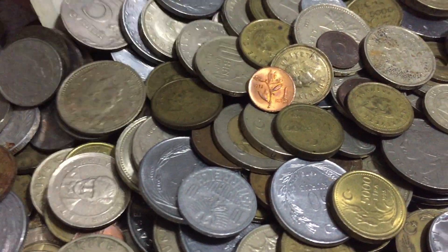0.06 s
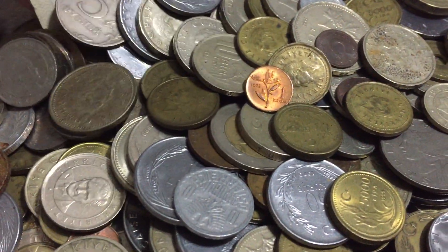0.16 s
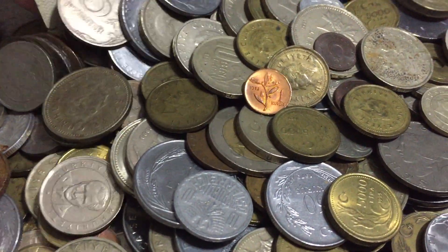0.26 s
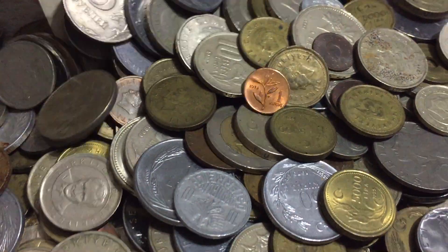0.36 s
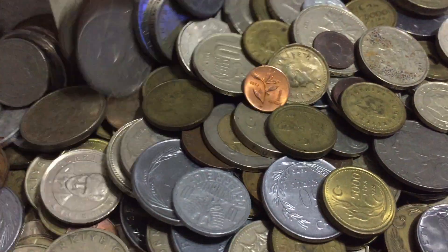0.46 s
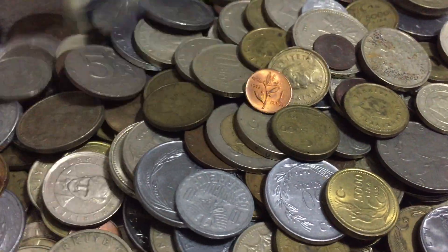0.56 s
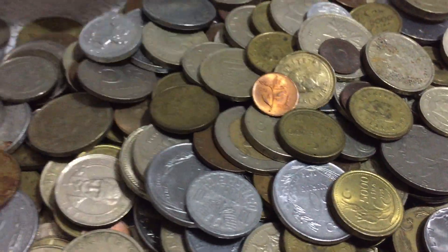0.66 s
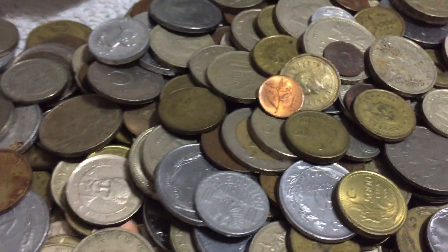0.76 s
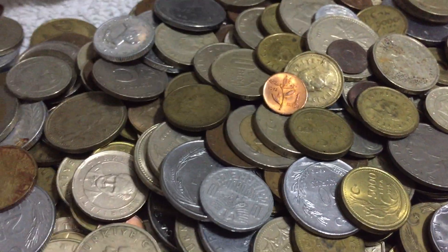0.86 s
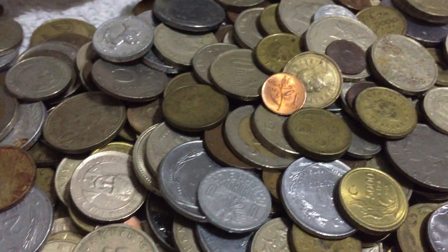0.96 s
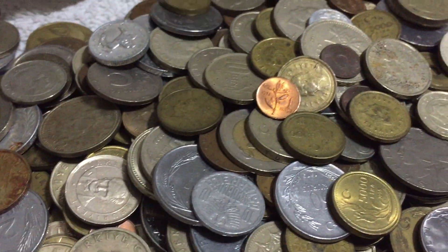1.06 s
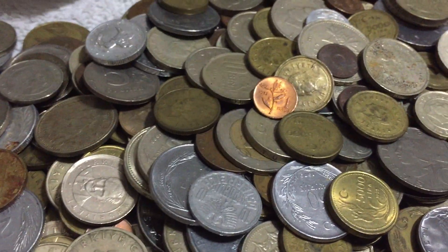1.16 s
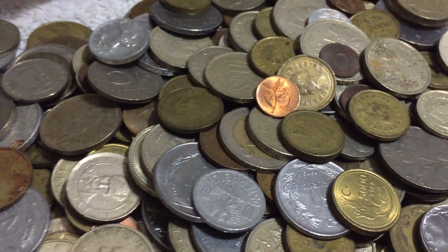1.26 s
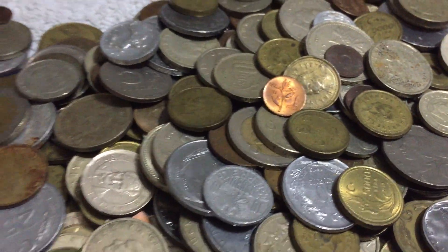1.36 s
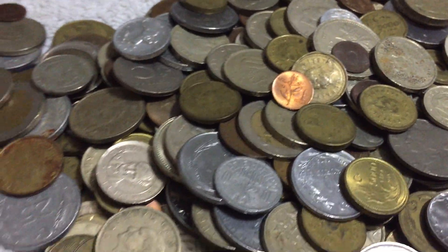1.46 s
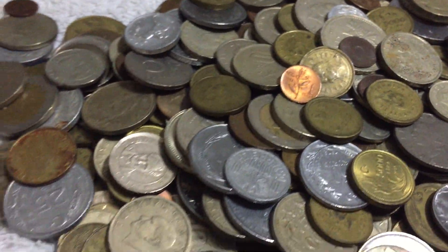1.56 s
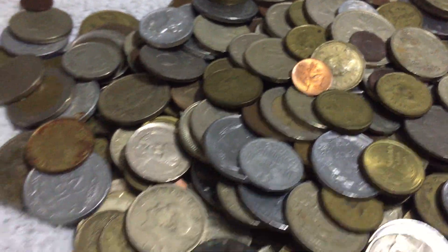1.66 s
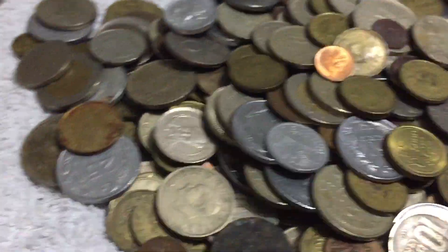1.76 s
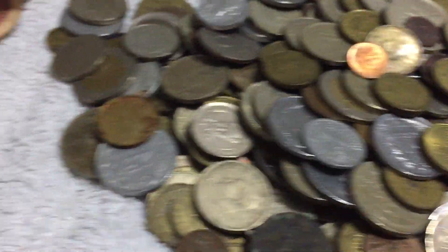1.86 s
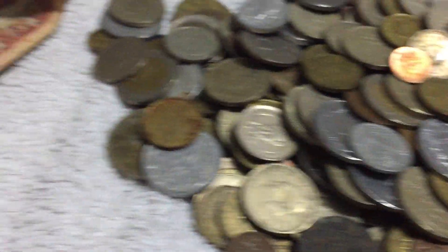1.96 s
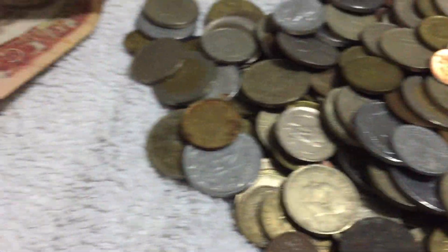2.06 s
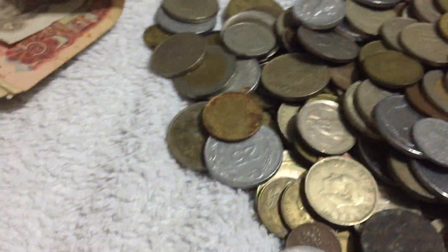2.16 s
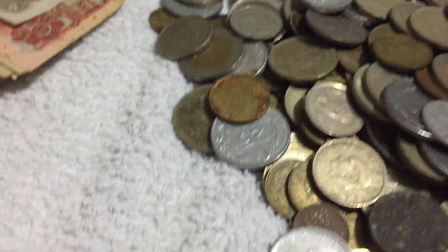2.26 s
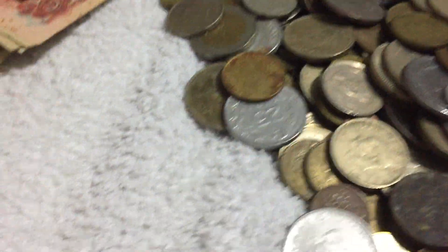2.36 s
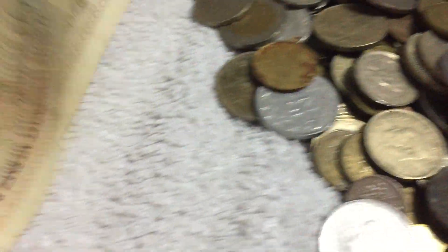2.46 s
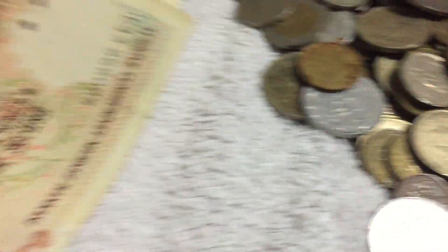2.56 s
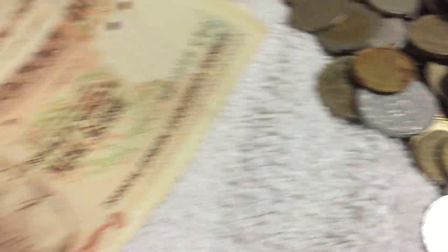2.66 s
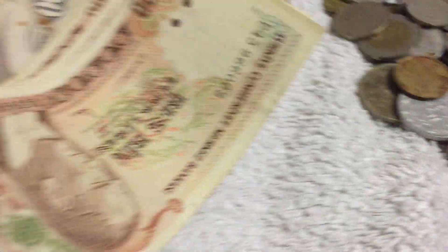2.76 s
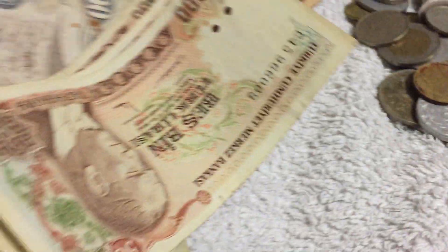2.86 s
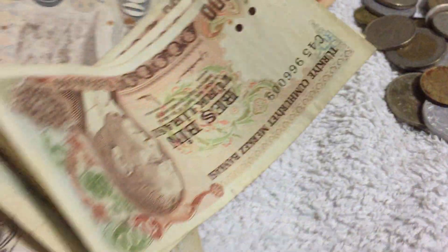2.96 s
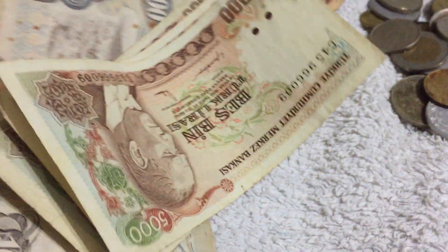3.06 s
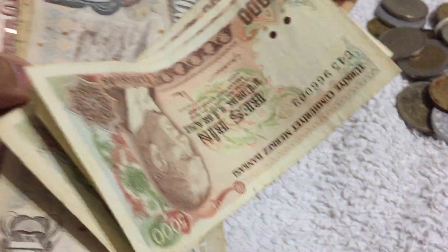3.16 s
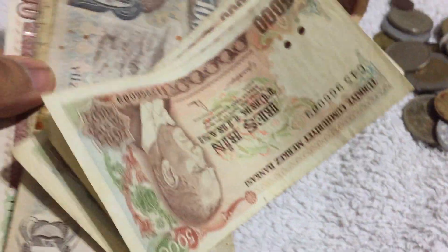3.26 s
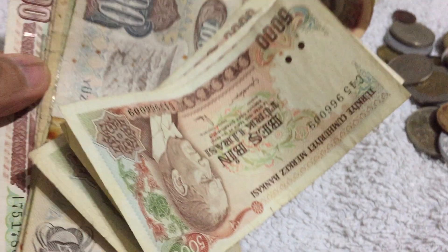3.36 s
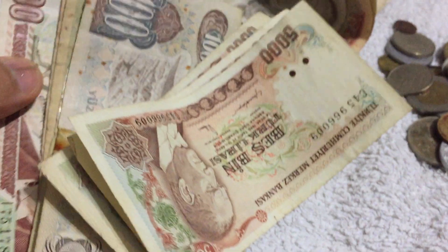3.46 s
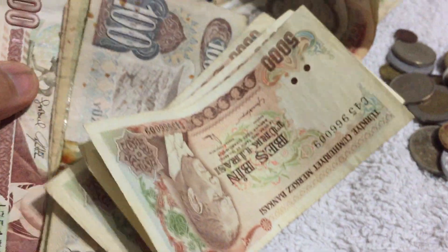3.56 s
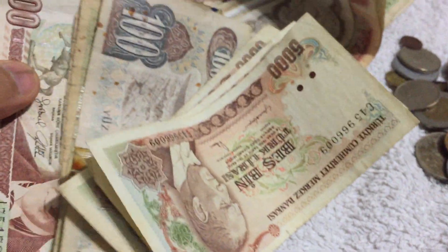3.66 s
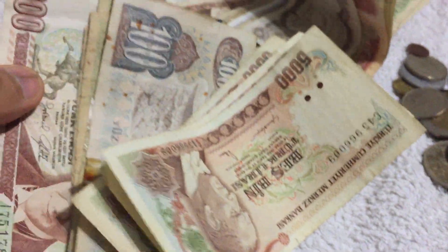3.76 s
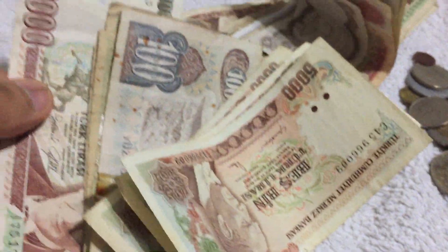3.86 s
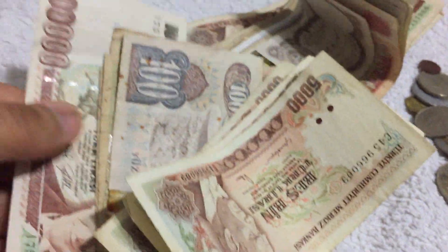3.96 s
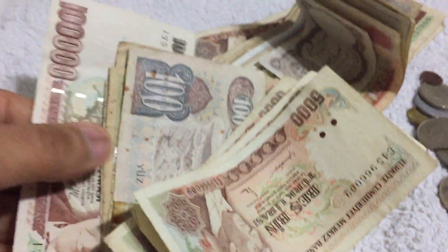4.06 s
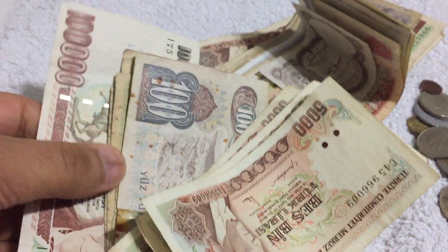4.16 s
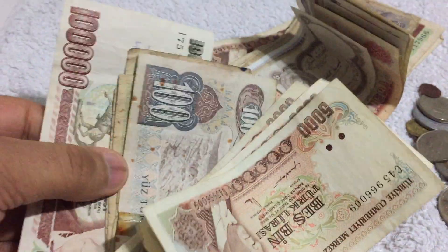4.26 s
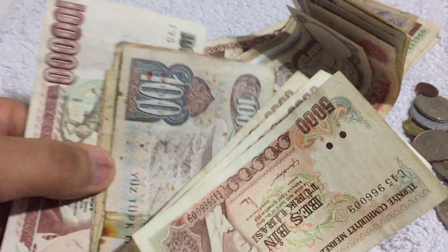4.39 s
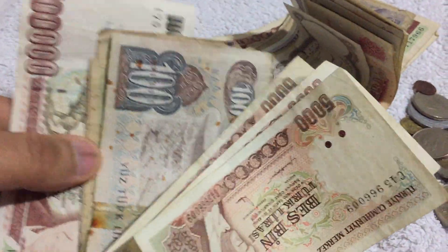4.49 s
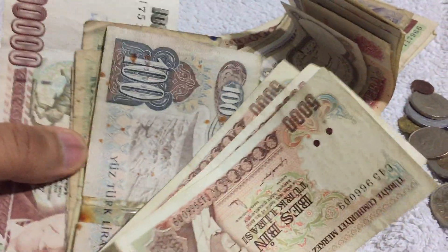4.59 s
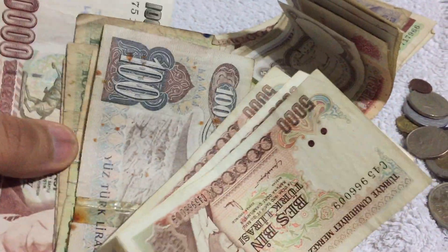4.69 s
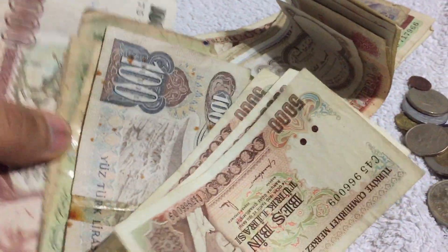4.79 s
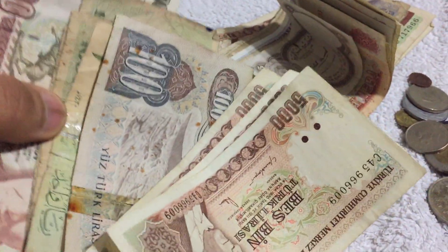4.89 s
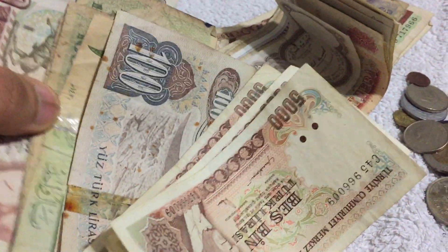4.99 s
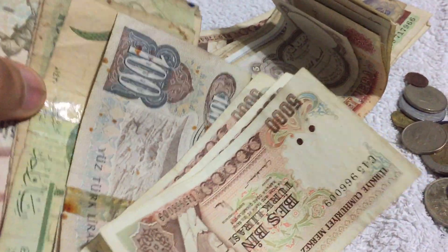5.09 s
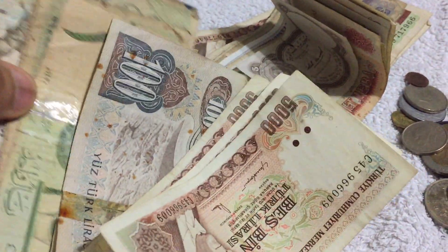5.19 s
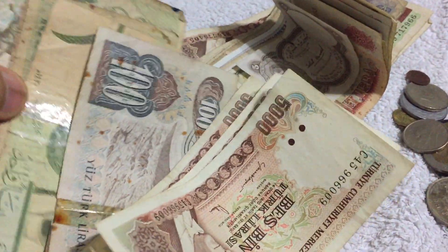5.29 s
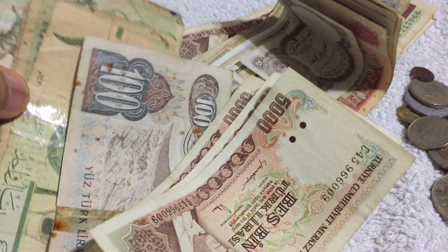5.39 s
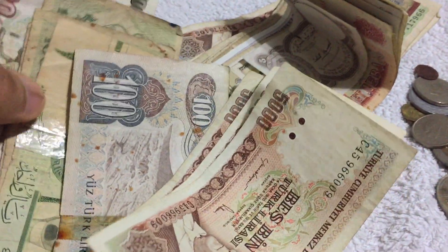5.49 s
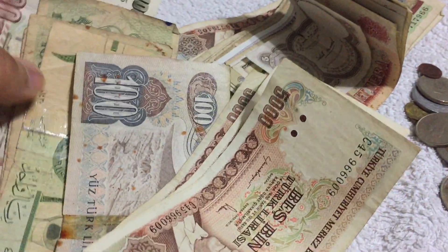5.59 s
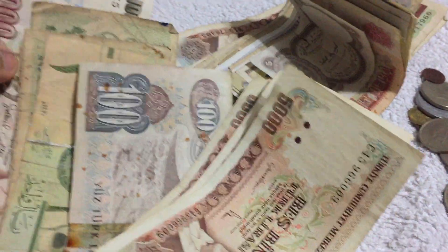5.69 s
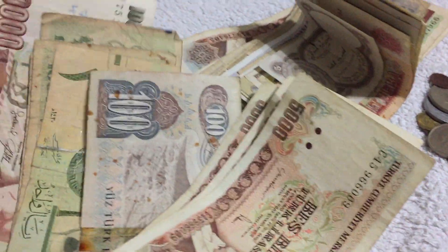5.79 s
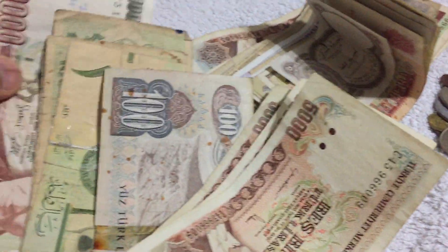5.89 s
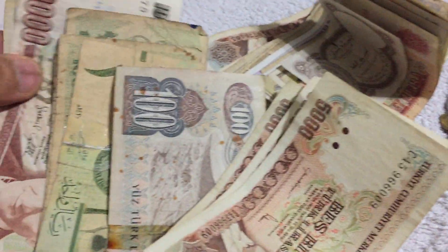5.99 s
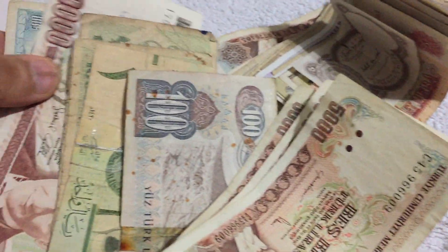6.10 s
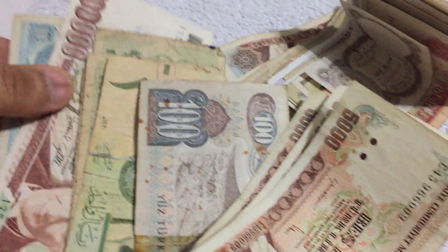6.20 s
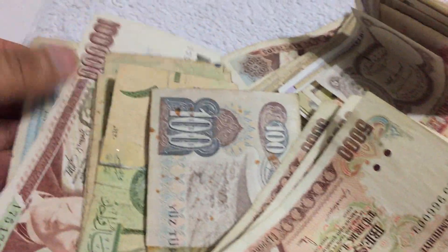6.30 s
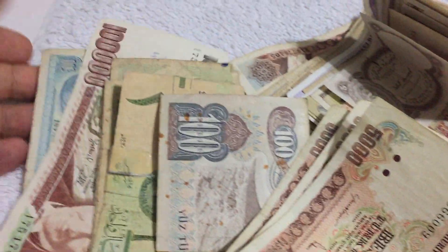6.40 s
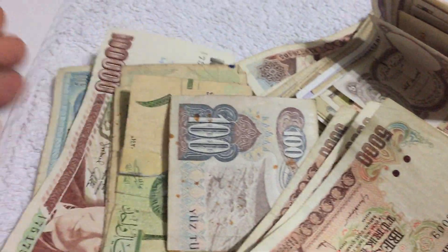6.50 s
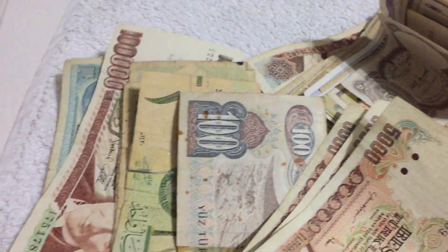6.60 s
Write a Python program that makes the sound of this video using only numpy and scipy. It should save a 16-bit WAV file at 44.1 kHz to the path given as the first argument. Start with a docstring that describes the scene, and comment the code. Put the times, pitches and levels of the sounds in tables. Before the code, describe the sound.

A heap of metal coins clinks loudly as it is stirred, then paper banknotes rustle faintly over a low hum.

```python
"""In a small room with a low hum, close to the microphone, a hand stirs a heap of coins on a table covered
by a towel. The coins scrape and clink against each other, then slide in a rush at about half a second.
Just after one second a soft thump shakes the table, and the last coins drop and ring.
From about two seconds on, old banknotes are pushed about and leafed through: their fibres catch and slip,
their creases snap, and now and then the hand bumps the towel."""
import sys
import numpy as np
from scipy import signal
from scipy.fft import rfft, irfft
from scipy.io import wavfile

SR = 44100
rng = np.random.default_rng(int(sys.argv[2]) if len(sys.argv) > 2 else 0)


def wav_record(signal):
    """Record a signal, one row per channel, as 16-bit PCM in the file named by sys.argv[1]."""
    frames = np.transpose(np.atleast_2d(signal))
    bounded = np.clip(frames, -1, 1)
    # unit amplitude maps onto the largest positive 16-bit level
    quanta = np.round(bounded * 32767).astype(np.int16)
    wavfile.write(sys.argv[1], SR, quanta)


N = 292868
TIME = np.arange(N) / SR


def from_db(db):
    """Turn decibels into a number to multiply a sound by."""
    return 10 ** (np.asarray(db) / 20)


def unit_power(x):
    """Scale a sound so that its average power is 1."""
    return x / np.sqrt(np.mean(x ** 2) + 1e-20)


def at_hz(points, hz):
    """Read a table between its rows, giving every octave the same room."""
    pitches, values = np.transpose(points)
    return np.interp(np.log(np.maximum(hz, 1)), np.log(pitches), values)


def colour(x, tone):
    """Give a sound a tone: the table says how strong each pitch is next to the others."""
    size = 4096
    strengths = from_db(at_hz(tone, np.arange(size // 2 + 1) * SR / size))
    cepstrum = irfft(np.log(strengths))
    # folding it in half makes a filter that never sounds ahead of a hit
    cepstrum[1:size // 2] *= 2
    cepstrum[size // 2 + 1:] = 0
    response = irfft(np.exp(rfft(cepstrum)))
    return signal.oaconvolve(x, response / np.linalg.norm(response))[:N]


def ring(clicks, hz, ring_s):
    """Each click starts a pure tone. Here and below, ring_s is the time it takes to fade by 60 dB."""
    keep = from_db(-60 / (ring_s * SR))
    turn = 2 * np.pi * hz / SR
    return signal.lfilter([0, np.sin(turn)], [1, -2 * keep * np.cos(turn), keep * keep], clicks + 1e-18)


def add(track, start_s, sound):
    """Mix a sound into a track at the given time."""
    i = int(np.clip(round(start_s * SR), 0, N - 1))
    track[i:i + len(sound)] += sound[:N - i]


def strikes(rows):
    """Make one click for each row of start_s, level_db."""
    clicks = np.zeros(N)
    for start_s, level_db in rows:
        add(clicks, start_s, from_db([level_db]))
    return clicks


def grains(per_s, spread_db):
    """Tiny contacts at random times; a larger spread makes their strengths more uneven."""
    sizes = from_db(spread_db * np.minimum(rng.exponential(1, N), 4)) * rng.choice([-1, 1], N)
    touching = rng.random(N) < per_s / SR
    return unit_power(sizes * touching / np.sqrt(per_s))


def burst(fade_s):
    """A brief crunch of tiny slips that fades by 60 dB in fade_s."""
    t = TIME[:SR // 8]
    slips = rng.choice([-1, 1], len(t)) * rng.uniform(.2, 1, len(t)) * from_db(-60 * t / fade_s)
    return slips / np.linalg.norm(slips)


def friction(level, slow_per_s, extra_per_s, spread_db):
    """A slow movement slips in separate catches; a fast one adds more and runs them together."""
    return level * grains(slow_per_s + extra_per_s * level / level.max(), spread_db)


def movements(rows):
    """Four loudness curves: each hand movement swells for rise_s, then loses 20 dB in fade_s."""
    fade_shape = 1.1   # above 1: slowly at first, then faster
    power, t = np.zeros((4, N)), TIME[:SR * 3 // 4]
    for start_s, rise_s, fade_s, level_db, *offsets_db in rows:
        swell = np.sin(np.pi / 2 * np.minimum(t / rise_s, 1))
        fade = from_db(-20 * (np.maximum(t - rise_s, 0) / fade_s) ** fade_shape)
        for layer, offset_db in zip(power, [0, *offsets_db]):
            add(layer, start_s, (from_db(level_db + offset_db) * swell * fade) ** 2)
    return np.sqrt(power)


def room(x, echo_db):
    """The walls add a wash of echoes in which high pitches die sooner than low ones."""
    # how long the room rings: pitch_hz, ring_s
    ring_times = [(150, .5), (600, 0.21), (3000, 0.27), (8000, .22), (16000, 0.16)]
    t, tail = TIME[:SR // 2], 0
    edges_hz = np.geomspace(60, 17000, 9)
    for low, high in zip(edges_hz, edges_hz[1:]):
        band_filter = signal.butter(2, [low, high], "band", fs=SR, output="sos")
        band = signal.sosfilt(band_filter, rng.standard_normal(len(t)))
        tail = tail + band * from_db(-60 * t / at_hz(ring_times, np.sqrt(low * high)))
    tail = tail * (t > .004)   # the first echo takes 4 ms
    return x + from_db(echo_db) * signal.oaconvolve(x, tail / np.linalg.norm(tail))[:N]


def background():
    """Still air and the wavering hum of a distant appliance, there from start to end."""
    # the tones of the hum: pitch_hz, width_hz, level_db
    hum_tones = [(283, 18, -79.5), (343.4, 3.6, -76), (395, 2.6, -82.5)]
    # the tone of the air: pitch_hz, level_db
    air_tone = [(20, -25.5), (45, -4.5), (80, -2), (180, -4.5), (260, -4), (380, -7.5), (520, -13),
                (800, -14.5), (1500, -16), (3000, -17.5), (5000, -21.5), (8000, -24), (10500, -25.5),
                (15500, -26)]
    hum = 0
    for pitch_hz, width_hz, level_db in hum_tones:
        ring_s = np.log(1000) / (np.pi * width_hz)
        hum = hum + from_db(level_db) * unit_power(ring(rng.standard_normal(N), pitch_hz, ring_s))
    return hum + from_db(-71.5) * colour(rng.standard_normal(N), air_tone)


def heap_motion():
    """Loudness curves for scrape, jingle, knock and rumble as the hand pushes and the heap slides."""
    # the hand pushes into the heap: start_s, rise_s, fade_s, scrape_db,
    # then, counted from scrape_db: jingle_db, knock_db, rumble_db
    pushes = [(0.0, 0.0013, 0.1, -40, 1, -4.5, -23), (.06, 0.053, .07, -50.5, -20, -0.5, -13),
              (.135, 0.033, 0.086, -46, -10, -4.5, -6), (.19, 0.079, 0.067, -43.5, -18, -14.5, -22),
              (.29, 0.058, 0.037, -41, -12, -7.5, -19.5), (.37, 0.12, 0.038, -41, -11, -10, -24),
              (.745, 0.029, 0.066, -51.5, 4, -10, -1), (.828, 0.046, 0.058, -49, 10, -11.5, 0.5),
              (.93, 0.079, 0.075, -55.5, 5.5, -9.5, -4.5)]
    # one side of the heap slides down: time_s, jingle_db, knock_db
    slide = [(.47, -48, -49.5), (.481, -22, -38), (.503, -31.5, -38), (.53, -22, -35), (.605, -23.5, -37),
             (.635, -24.5, -32), (.674, -13.5, -34.5), (.702, -26, -47), (.74, -25, -50),
             (.765, -53.5, -66.5)]
    times_s, *columns = np.transpose(slide)
    jingle, knock = [from_db(np.interp(TIME, times_s, db, left=-np.inf, right=-np.inf)) for db in columns]
    scrape = np.sqrt(jingle * knock)   # midway between the two
    weight = (scrape / scrape.max()) ** 1.9   # swells more steeply than the scrape
    lag_s = 0.028   # the heavy table follows a little late
    keep = np.exp(-1 / (lag_s * SR))
    rumble = signal.lfilter([1 - keep], [1, -keep], weight + 1e-18)
    sliding = [from_db(-2) * scrape, from_db(0.5) * jingle, knock, from_db(-31.5) * rumble]
    return np.hypot(movements(pushes), sliding)


def coin_contacts(contacts, ring_s, ring_db, count):
    """Each contact ticks and rings one of many coins, which its neighbours quickly hush."""
    pitches_hz = np.linspace(5500, 15600, count) + rng.uniform(-100, 110, count)
    rings_s = ring_s * from_db(rng.normal(0, 3.9, count))
    which_coin = rng.integers(0, count, N)
    ringing = np.zeros(N)
    for k in range(count):
        energy = rings_s[k] * SR / np.log(1e12)   # used to make long and short rings equally strong
        ringing += ring(contacts * (which_coin == k), pitches_hz[k], rings_s[k]) / np.sqrt(energy)
    return (contacts + from_db(ring_db) * ringing) / np.hypot(1, from_db(ring_db))


def sliding_coins(scrape, jingle, knock):
    """Coins pour over each other: rims jingle, faces scrape and knocks travel down through the heap."""
    # the tone of rims touching: pitch_hz, level_db
    rim_tone = [(2500, -31), (5500, -8), (7500, -5.5), (8500, 1), (10300, -3), (12000, -2.5), (14000, 4.5),
                (16000, -8.5)]
    # the tone of faces scraping: pitch_hz, level_db
    face_tone = [(900, -33), (2250, -8), (3200, -3), (4100, -3.5), (5200, -7), (6300, -0.5), (8000, -15),
                 (12000, -28)]
    # the tone of knocks inside the heap: pitch_hz, level_db
    heap_tone = [(150, -20.5), (400, -7), (620, 5), (900, -3.5), (1250, -1.5), (1750, -3.5), (2150, -14.5),
                 (5000, -29)]
    rim_hits = jingle * grains(per_s=4400, spread_db=5)
    rims = colour(coin_contacts(rim_hits, ring_s=0.028, ring_db=-0.5, count=72), rim_tone)
    faces = colour(friction(scrape, slow_per_s=900, extra_per_s=5100, spread_db=3.5), face_tone)
    depth = np.clip(knock / knock.max(), 1e-9, 1)
    deep = knock * np.sqrt(depth) * grains(per_s=1300, spread_db=0)
    light = knock * np.sqrt(1 - depth) * grains(per_s=830, spread_db=0.5)
    # light contacts stay in the top layer of the heap and lack its low pitches
    light = signal.sosfilt(signal.butter(2, 1200, "high", fs=SR, output="sos"), light)
    return from_db(-3) * rims + from_db(-0.75) * faces + from_db(1.5) * colour(deep + light, heap_tone)


def free_coins():
    """A coin held at just one point rings on; it is not quite round, so a twin tone makes it waver."""
    # coins that come free: start_s, pitch_hz, level_db, ring_s
    coins = [(.003, 11364, -35, 0.13), (0.215, 11300, -23, 0.033), (.326, 13100, -34, 0.15),
             (.555, 12700, -30, .065), (.57, 14000, -16, .05), (0.634, 11500, -21, .12),
             (.645, 14600, -18.5, .083), (.682, 11160, -13, 0.051), (.860, 13280, -28, 0.11),
             (.868, 12070, -28.5, 0.11), (0.879, 10380, -30.5, .11), (1.086, 11724, -14, 0.12),
             (1.192, 11120, -25, 0.17), (1.260, 14500, -28, .08), (1.268, 11140, -35.5, 0.19),
             (1.347, 10330, -43, .26), (1.346, 11220, -33, 0.3)]
    twin_gap_hz, twin_db = 14, -13
    ringing = np.zeros(N)
    for start_s, pitch_hz, level_db, ring_s in coins:
        hit = strikes([(start_s, level_db)])
        ringing += ring(hit, pitch_hz, ring_s)
        ringing += from_db(twin_db) * ring(hit, pitch_hz + twin_gap_hz, ring_s)
    return from_db(-1.5) * ringing


def knocks():
    """A stack gives way and lands flat: the whole heap answers with a dull clack."""
    # the heap settles: start_s, level_db
    landings = [(0.011, -45), (0.051, -39), (0.356, -26.5), (0.383, -36), (0.493, -15), (0.525, -19.5),
                (0.634, -23), (0.641, -25)]
    # the tones of the whole heap: pitch_hz, level_db, ring_s
    heap_tones = [(624, -10, 0.0082), (870, 0, 0.0046), (1160, 4, 0.0018), (1720, -6.5, 0.0055),
                  (3300, -13.5, 0.0036)]
    hits, clacks = strikes(landings), np.zeros(N)
    for k, (pitch_hz, level_db, ring_s) in enumerate(heap_tones):
        direction = (-1) ** k   # every second tone swings the other way
        clacks += direction * from_db(level_db) * ring(hits, pitch_hz, ring_s)
    return from_db(8.5) * clacks


def clinks(scrape):
    """Coin hits coin: a hard first touch, then weaker bounces. Stray ticks come wherever coins scrape."""
    # single hits and how long their bounces last: start_s, level_db, settle_s
    hits = [(0.0378, -19.5, 0.049), (0.048, -20, 0.023), (0.07, -19, 0.018), (0.1045, -24.5, 0.0068),
            (0.1812, -26, 0.018), (.1956, -27.5, 0.063), (0.215, -10.5, 0.013), (0.2247, -16, 0.019),
            (0.254, -16, 0.0067), (.2973, -39, .03), (.3106, -25, 0.014), (.3253, -20.5, 0.022),
            (0.357, -21.5, 0.013), (0.398, -30, 0.047), (.4094, -25, 0.039), (0.4447, -17, 0.031),
            (.477, -22, 0.028), (0.48, -8.5, 0.018), (.568, -9.5, 0.016), (0.6704, -4, 0.039),
            (0.6826, -4.5, 0.028), (.7377, -17, 0.047), (.7707, -32, .027), (.8156, -30.5, 0.016),
            (0.8687, -13.5, 0.04), (0.874, -22, 0.025), (1.0312, -27.5, 0.022), (1.0846, -13, 0.045),
            (1.1038, -12.5, 0.083), (1.133, -13.5, 0.026), (1.143, -21.5, 0.058), (1.1835, -21.5, .038),
            (1.1927, -8.5, 0.039), (1.209, -24.5, 0.1), (1.2354, -26.5, 0.12), (1.2598, -19, 0.071),
            (1.287, -22, 0.063), (1.3466, -23, 0.09)]
    # the tone of a clink: pitch_hz, level_db
    clink_tone = [(300, -41), (1500, -17), (2200, -17.5), (3200, -10.5), (6000, -5.5), (9000, 2.5),
                  (12000, 0), (16000, 0)]
    bounce_db, tick_db = -11, -6
    touches, bounce_level = np.zeros(N), np.zeros(N)
    for start_s, level_db, settle_s in hits:
        add(touches, start_s, from_db(level_db) * burst(fade_s=0.002))
        add(bounce_level, start_s, from_db(level_db + bounce_db - 60 * TIME[:SR // 4] / settle_s))
    ticks = from_db(tick_db) * scrape * grains(per_s=90, spread_db=5.5)
    bounces = bounce_level * grains(per_s=2700, spread_db=0.5)
    contacts = from_db(-0.5) * touches + bounces + ticks
    return colour(coin_contacts(contacts, ring_s=0.022, ring_db=-10, count=48), clink_tone)


def table(rumble):
    """The table rumbles under the moving heap, rings from soft blows, then rumbles as the hand bumps it."""
    # the tone of the rumble: pitch_hz, level_db
    rumble_tone = [(25, -23), (80, -1.5), (130, 0.5), (210, 5), (300, -2), (450, -20.5), (1200, -51)]
    # soft blows on the table: start_s, level_db
    blows = [(1.047, -0.5), (1.074, -5)]
    # the tones of the table top: pitch_hz, level_db, ring_s
    board_tones = [(138.3, -32, 0.18), (174.4, -51, 1), (196, -17.5, 0.039), (217, -45, 0.64),
                   (273, -35, 0.23), (350, -35.5, 0.11), (485, -44, 0.062), (520, -47.5, 0.075),
                   (809, -49, 0.11)]
    # the hand bumps the towel: start_s, level_db
    bumps = [(3.002, -65.5), (3.175, -66), (4.421, -75.5), (5.938, -74.5), (6.024, -77), (6.549, -67)]
    soft_hits = signal.sosfilt(signal.butter(3, 850, fs=SR, output="sos"), strikes(blows))
    thump = sum(from_db(db) * ring(soft_hits, hz, ring_s) for hz, db, ring_s in board_tones)
    # a board gives off little sound below its lowest tone
    thump = signal.sosfilt(signal.butter(4, 124, "high", fs=SR, output="sos"), thump)
    bump_fade = np.exp(-TIME[:SR // 2] / 0.085)   # down to about a third in 85 ms
    shaking = rumble.copy()
    for start_s, level_db in bumps:
        add(shaking, start_s, from_db(level_db) * bump_fade)
    return room(thump, echo_db=-12) + from_db(-1.5) * shaking * colour(rng.standard_normal(N), rumble_tone)


def shifting():
    """Four faint loudness curves, steady once the hand holds the notes and they shift under it."""
    # the quiet between strokes: rub_db, edge_db, rasp_db, brush_db
    levels_db = (-75.5, -82, -79.5, -83)
    reach_s, hold_s = 1.8, 2.03
    return np.outer(from_db(levels_db), np.interp(TIME, [reach_s, hold_s], [0, 1]))


def banknotes():
    """Fibres catch and slip as the sheets slide over each other and over the towel."""
    # a note is pushed or leafed over: start_s, rise_s, fade_s, rub_db,
    # then, counted from rub_db: edge_db, rasp_db, brush_db
    strokes = [(1.86, 0.023, 0.14, -66, -8, -20.5, -6), (1.93, 0.14, .13, -59.5, -12, -25.5, -7.5),
               (2.12, 0.085, 0.21, -69.5, -3.5, -16.5, 2.5), (2.332, 0.02, 0.16, -50, -26.5, -9, -11.5),
               (2.385, 0.017, 0.13, -52.5, -7.5, -5.5, -20), (2.51, 0.083, 0.083, -57.5, -3.5, -0.5, -11),
               (2.62, 0.16, .3, -70.5, -6.5, -4, -19.5), (2.89, 0.097, 0.29, -63, -3, -3, -6),
               (3.04, 0.16, 0.085, -70.5, -2, 0, -8.5), (3.27, 0.15, 0.19, -71.5, -10, -9, -15),
               (4.40, 0.032, 0.019, -63.5, -9, 8, -10), (4.55, 0.094, .26, -73, -1, -7, -15.5),
               (4.87, 0.056, 0.056, -69.5, 1.5, -6, -11), (5.11, 0.051, 0.064, -75.5, 8, -10, -11),
               (5.28, 0.029, 0.035, -72, 5.5, -8, -15), (5.40, 0.041, 0.043, -69, 1.5, -8, -19),
               (5.545, 0.05, 0.03, -58.5, -9.5, -1, -8.5), (5.64, 0.12, .2, -69, -5.5, -2, -7.5),
               (5.87, 0.064, 0.035, -63, -2, 0.5, -2), (5.94, 0.055, 0.067, -66.5, -4.5, -2, -11),
               (6.005, 0.02, 0.09, -53.5, -9, -5, -9.5), (6.025, 0.04, 0.087, -55.5, -5, 4, -10.5),
               (6.1, 0.12, 0.057, -61, -7.5, 5.5, -11), (6.35, 0.22, 0.14, -75.5, -4, 8, -3.5)]
    # the tone of note rubbing on note: pitch_hz, level_db
    rub_tone = [(900, -37), (1700, -15.5), (2100, -3), (2500, 1.5), (2850, -2), (3300, 2), (4400, 0.5),
                (5000, -3.5), (6200, -3.5), (9000, -40), (16000, -29)]
    # the hiss of the edges: pitch_hz, level_db
    edge_tone = [(3000, -18.5), (6500, 1), (8500, 0.5), (10500, -4.5), (12500, -2.5), (16000, -10.5)]
    # the rasp of the sheet: pitch_hz, level_db
    sheet_tone = [(600, -32.5), (950, -3.5), (1220, 2), (1450, 0.5), (1750, 3), (2100, -11), (3400, -35),
                  (4400, -13), (5200, -28)]
    # the brushing on the towel: pitch_hz, level_db
    towel_tone = [(100, -23.5), (250, -7.5), (480, -6.5), (700, -3), (900, -1.5), (1150, -10), (3000, -32)]
    rub, edge, rasp, brush = np.hypot(movements(strokes), shifting())
    rubbing = colour(friction(rub, slow_per_s=800, extra_per_s=10000, spread_db=0.5), rub_tone)
    edges = colour(friction(edge, slow_per_s=630, extra_per_s=7000, spread_db=2), edge_tone)
    sheet = colour(rasp * grains(per_s=3500, spread_db=2), sheet_tone)
    towel = colour(brush * grains(per_s=660, spread_db=3.5), towel_tone)
    paper = from_db(-0.17) * rubbing + from_db(3.2) * edges + from_db(-0.1) * sheet
    return paper + from_db(-0.5) * towel + creases(rub)


def creases(rub):
    """A crease snaps and leaves the sheet shivering; small ones give way wherever the notes rub."""
    # large creases snap: start_s, level_db
    snaps = [(2.104, -50), (2.181, -51), (2.348, -45.5), (2.577, -38), (2.984, -45.5), (3.159, -48.5),
             (3.171, -30.5), (4.409, -48.5), (4.427, -44.5), (4.933, -54), (5.148, -51.5), (5.586, -40.5),
             (5.924, -43), (6.013, -42), (6.541, -52.5)]
    # the tone of a snap: pitch_hz, level_db
    snap_tone = [(100, -7), (600, -29), (1100, 8), (1700, 0), (4200, 7), (5500, 0), (8500, 4), (11000, -4),
                 (16000, -38)]
    # the brief tones of a stiff note: pitch_hz, level_db, ring_s
    note_tones = [(992, -9, 0.014), (1714, -6, 0.024), (2674, -2, 0.011), (3440, -13, 0.0056),
                  (4240, 0, 0.0079)]
    crunch = from_db(-13.5) * rub * grains(per_s=32, spread_db=5)   # the small creases
    for start_s, level_db in snaps:
        snap = burst(fade_s=0.026)
        shiver = from_db(-3.5) * burst(fade_s=0.076)
        add(crunch, start_s, from_db(level_db + 8) * (snap + shiver))
    hits = strikes(snaps)
    ringing = sum(from_db(db) * ring(hits, hz, ring_s) for hz, db, ring_s in note_tones)
    return colour(crunch, snap_tone) + from_db(-6) * ringing


def scene():
    """Coins right under the microphone, then the notes a little farther off, in one channel."""
    scrape, jingle, knock, rumble = heap_motion()
    coins = sliding_coins(scrape, jingle, knock) + clinks(scrape) + free_coins() + knocks()
    mix = room(coins, echo_db=-19) + table(rumble) + room(banknotes(), echo_db=-15.5) + background()
    return mix[None]


def record(dry):
    """The very highest pitches are cut off steeply."""
    cutoff_hz = 15900
    return signal.sosfilt(signal.ellip(12, .1, 80, cutoff_hz, fs=SR, output="sos"), dry)


dry = scene()
out = record(dry)
wav_record(out)
```